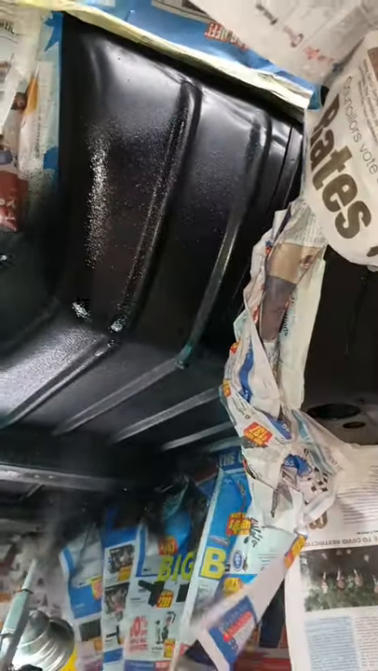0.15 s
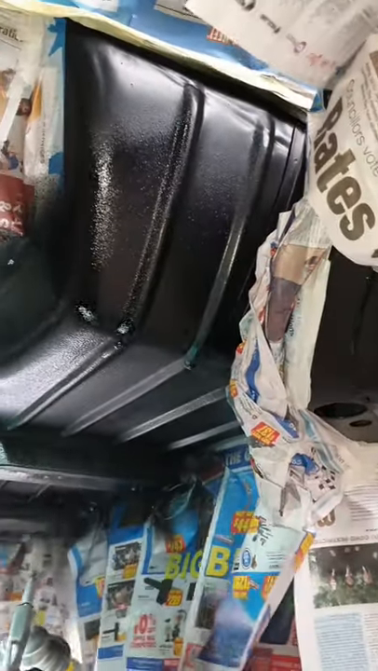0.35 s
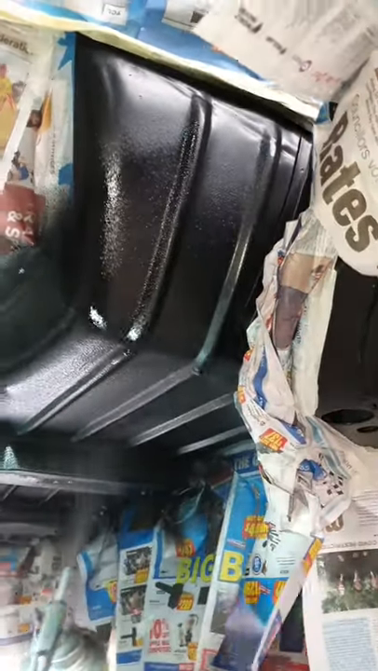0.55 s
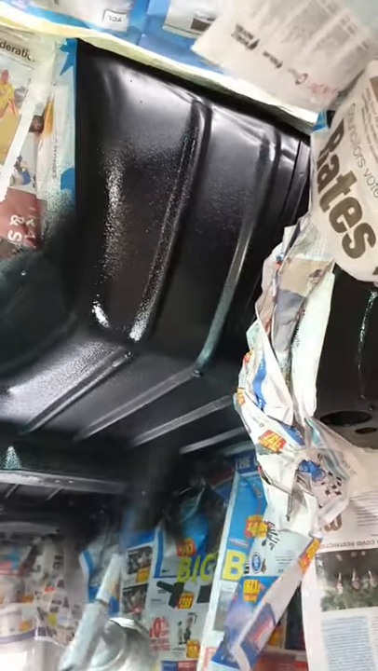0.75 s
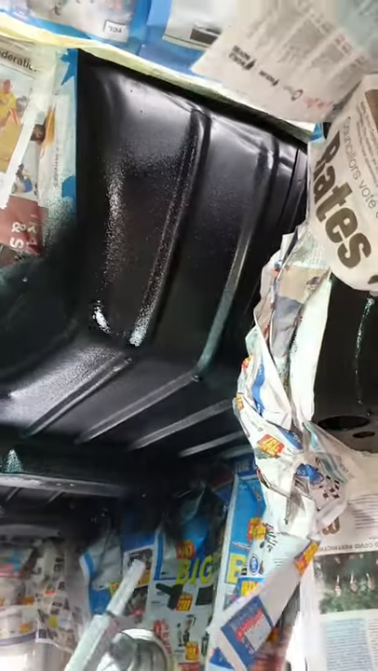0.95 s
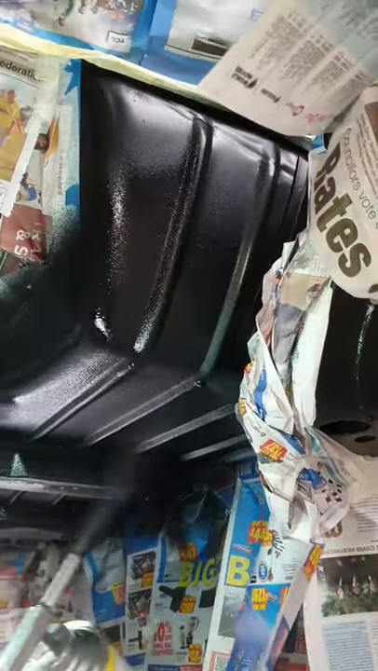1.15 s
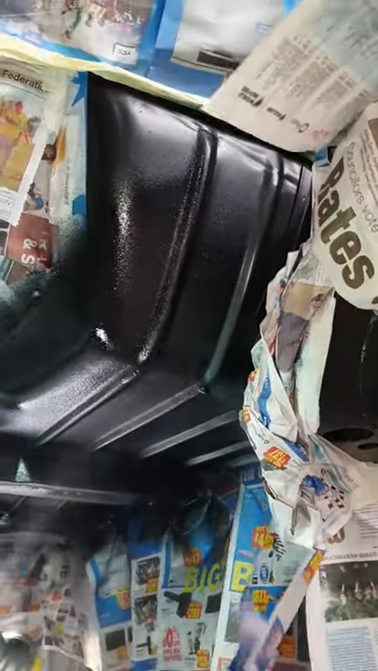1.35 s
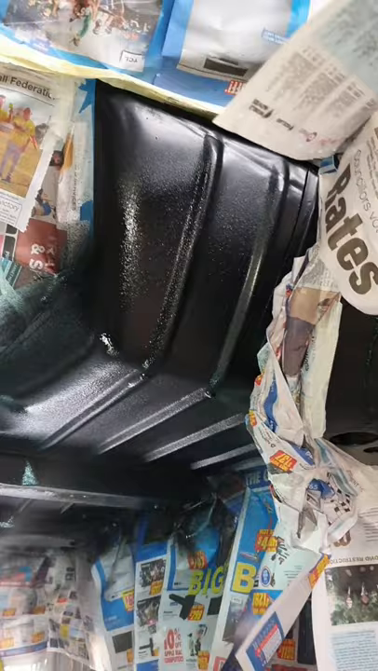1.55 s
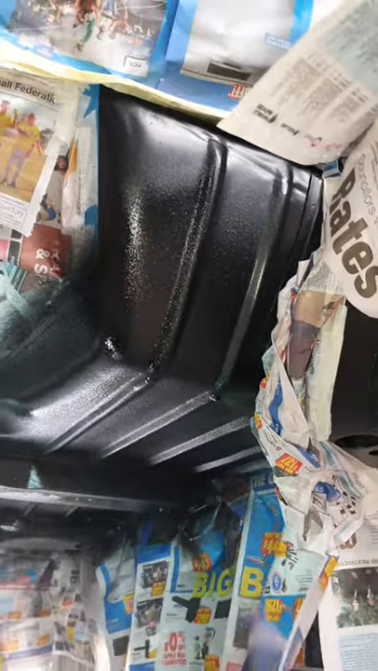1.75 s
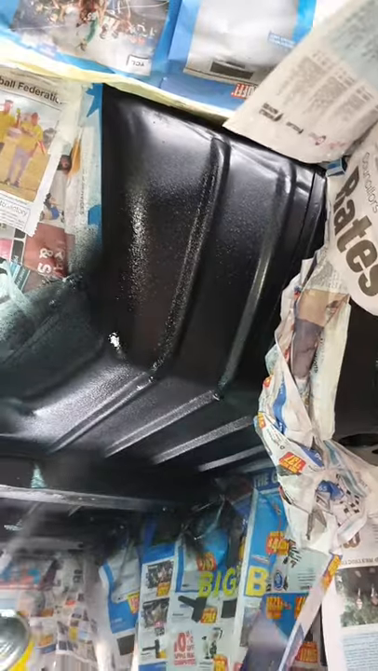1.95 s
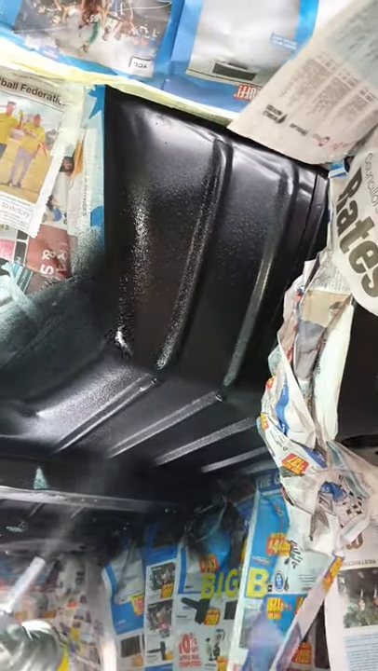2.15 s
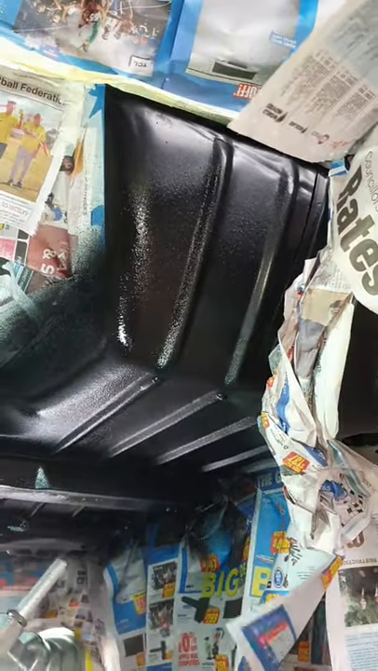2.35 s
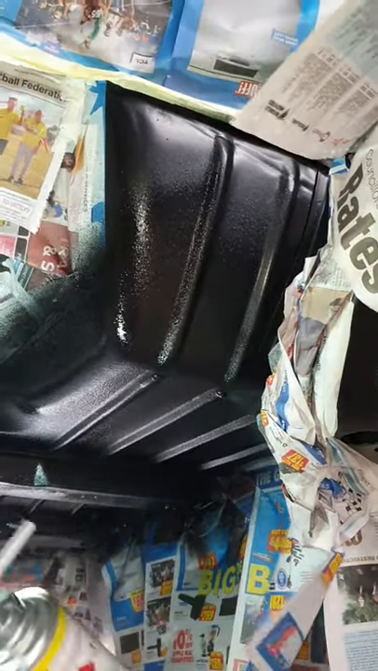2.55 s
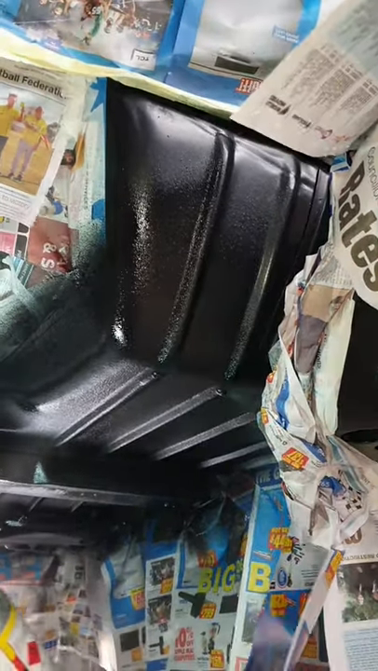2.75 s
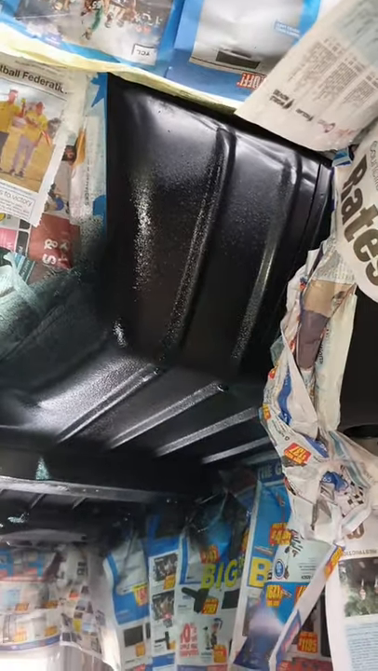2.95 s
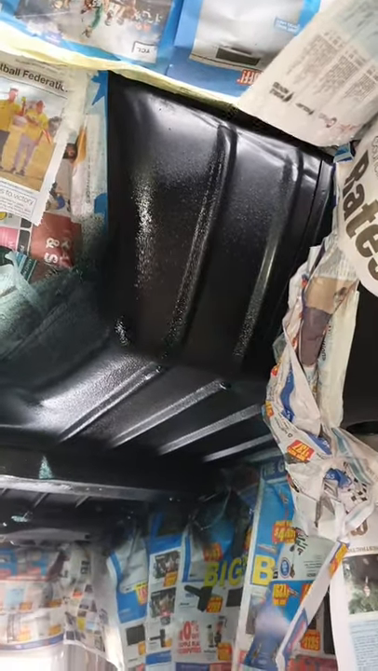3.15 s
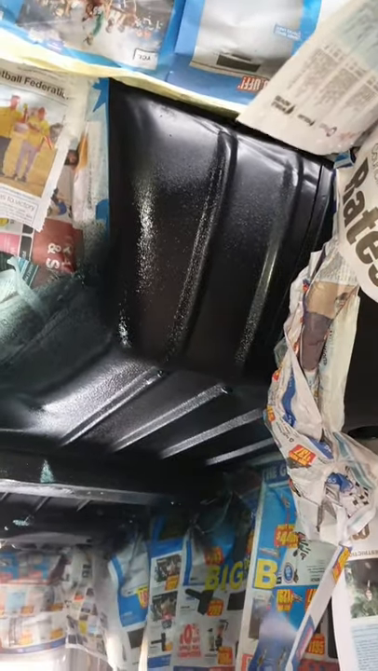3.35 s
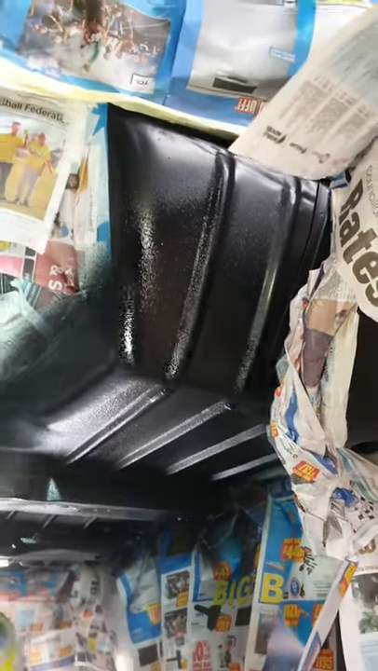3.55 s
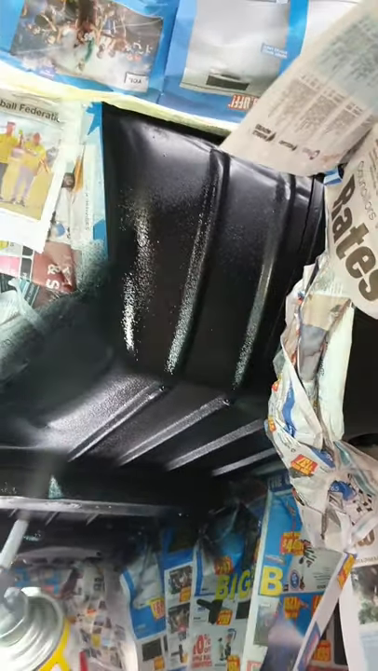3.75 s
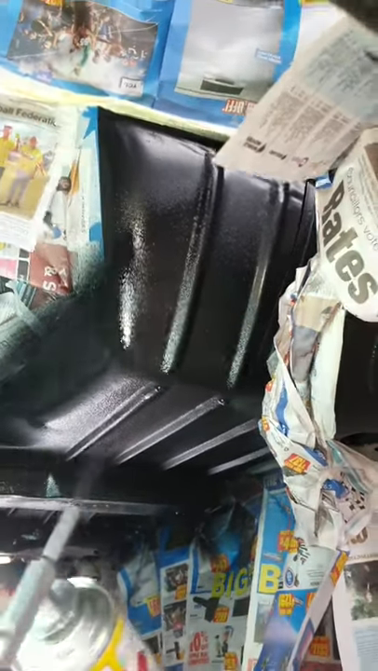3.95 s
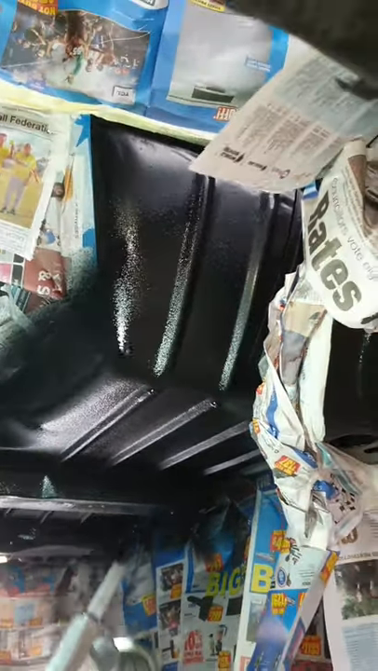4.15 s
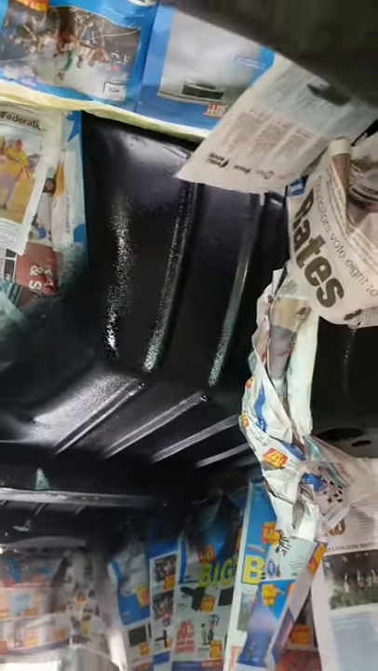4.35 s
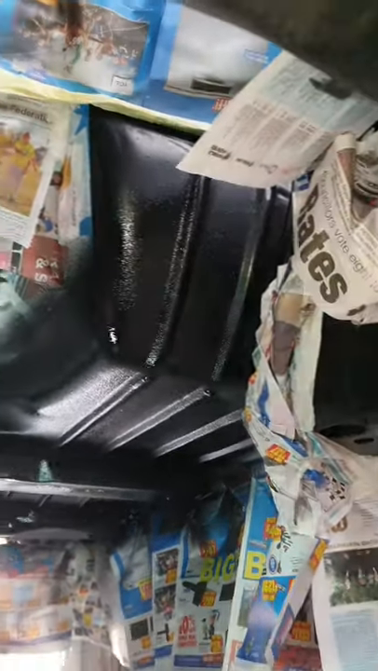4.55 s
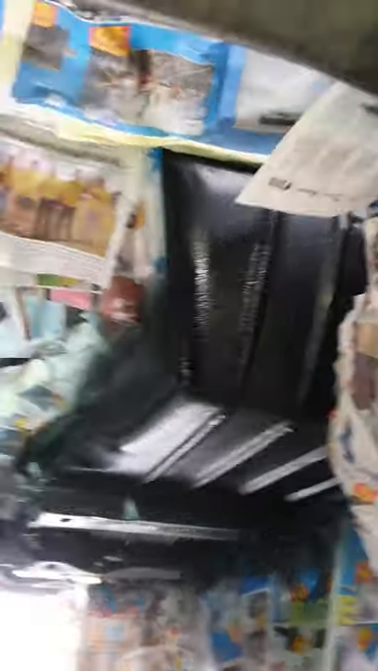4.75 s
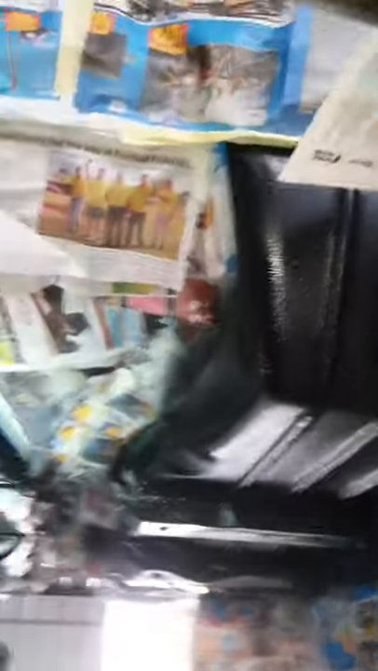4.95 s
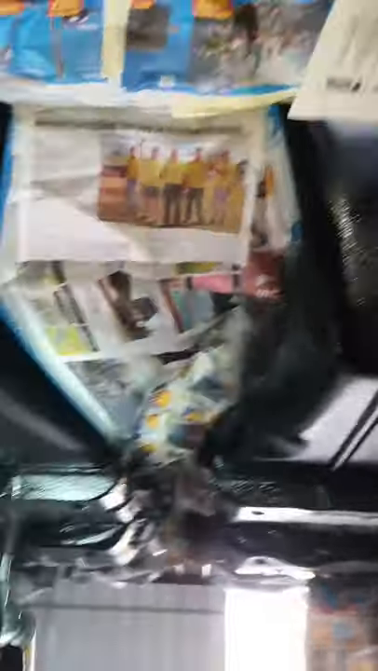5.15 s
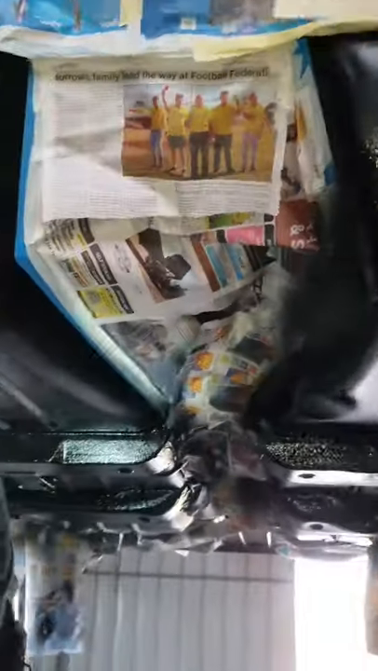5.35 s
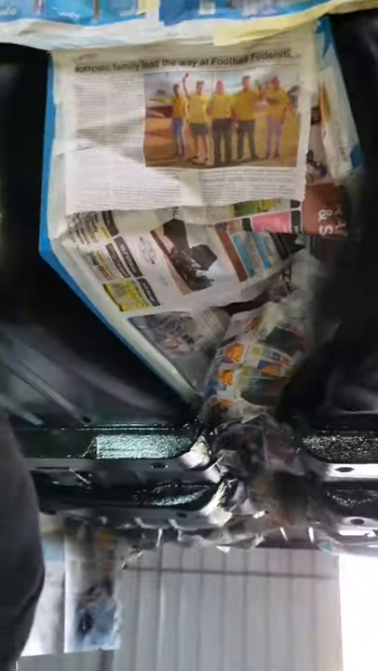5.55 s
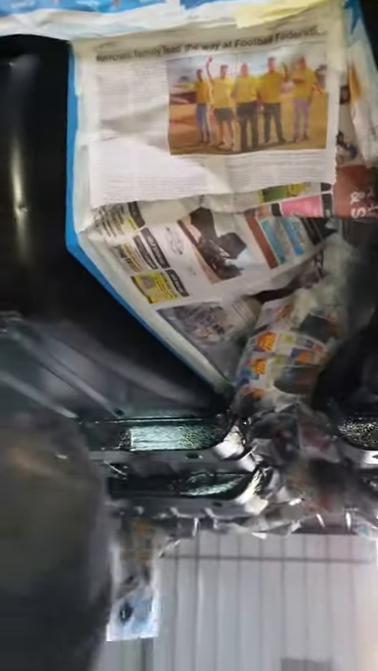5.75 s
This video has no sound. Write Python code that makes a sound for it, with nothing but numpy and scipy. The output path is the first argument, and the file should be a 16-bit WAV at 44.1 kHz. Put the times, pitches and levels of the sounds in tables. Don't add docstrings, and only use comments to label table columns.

```python
import sys
import numpy as np
from scipy import signal
from scipy.fft import rfft, irfft, next_fast_len
from scipy.io import wavfile
from scipy.ndimage import map_coordinates

SR = 44100
rng = np.random.default_rng(int(sys.argv[2]) if len(sys.argv) > 2 else 0)


def how_loud(loudness_db):
    steps = np.asarray(loudness_db, float) / 20
    return 10 ** steps


def unload_audio(sound):
    columns = np.transpose(np.atleast_2d(sound))
    steps = np.round(np.clip(columns, -1, 1) * 32767)
    wavfile.write(sys.argv[1], SR, steps.astype(np.int16))


N = 255339

# opens in seconds, shuts in seconds, opening time in seconds,
# shutting time in seconds.
TRIGGER_PULLS = [
    (-.1, .185, .004, .008),
    (.360, .790, .006, .008),
    (1.069, 1.497, .006, .009),
    (1.704, 2.225, .003, .008),
    (2.524, 2.985, .007, .010),
    (3.254, 3.895, .003, .008),
    (4.888, 5.505, .007, .014),
]
# time in seconds, treble level in dB, middle minus treble in dB,
# left minus right in dB.
JET_PULLS = [
    [(0.0, -23, -2.5, 1), (0.17, -24.5, -0.5, 1.5)],
    [(0.39, -26, 2, 1), (0.456, -25, -1, 3.5), (0.718, -22.5, -3.5, 3.0), (0.762, -24, -0.5, 3.0),
     (0.78, -24, -1, 4)],
    [(1.1, -22.5, -3, 1), (1.122, -23.5, -2, 2), (1.394, -25.5, 0, 2.0), (1.426, -24, -3, 3.5),
     (1.49, -24, -1, 2.0)],
    [(1.73, -25.5, -0.5, 1.5), (1.906, -23, -1.5, 2), (2.088, -23, -1, 4), (2.22, -24.5, -1.5, 3.0)],
    [(2.555, -24, 0, 2), (2.701, -23, -4, 1.5), (2.799, -24.5, -1.5, 2.5), (2.975, -25, -1.5, 3)],
    [(3.28, -27, 1, 0.5), (3.32, -23.5, -1, 1.5), (3.412, -22.5, -2, 2.5), (3.885, -23, -2.5, 4)],
    [(4.92, -28, -0.5, 2.0), (5.056, -24, -2, 2), (5.152, -22, -0.5, 0.5), (5.22, -24.5, 0.5, 3.5),
     (5.284, -22, -1.5, 2), (5.316, -25.5, 1.5, 3.5), (5.41, -25.5, 0, 4.5), (5.49, -26.5, 1.5, 5.5)],
]
# frequency in Hz, level in dB per Hz.
LEFT_PORT = [(900, -13.5), (1500, -12), (2100, -7), (3000, -2.5), (4500, -2.3), (5500, -1.6), (6300, 2.2),
             (7050, 1.2), (7500, -6.5), (8500, -2.5), (10000, -4), (12000, -4), (14000, -2), (15600, 1.5)]
# frequency in Hz, level in dB per Hz.
RIGHT_PORT = [(900, -15), (1500, -14.5), (2100, -8.5), (2700, -18.5), (3700, -12), (4750, -6), (5800, -19),
              (6800, -21), (7900, -15.5), (9000, -6.5), (10500, -9.5), (12200, -2.1), (14000, -11.5),
              (15600, -13.7)]
# delay in seconds, sway in seconds as the hand moves, level in dB.
PANEL_ECHOES = [(.0007, .00012, -9.5), (.0016, .0002, -8.5), (.0029, .0003, -7.5), (.0047, .0004, -9.5),
                (.0075, .0004, -11.5)]
# frequency in Hz, time under the car in seconds,
# time in the garage in seconds.
DECAY_TIMES = [(700, .25, .9), (2000, .25, .85), (5000, .22, .7), (9000, .2, .55), (15000, .18, .45)]
# multiple of the turning rate, left level in dB rms, right level in dB rms.
COMPRESSOR_TONES = [(3, -69, -74), (4, -51, -49.5), (5, -47.5, -47.5), (6, -55.5, -56.5), (7, -78, -73),
                    (8, -70, -65), (9, -54, -53.0), (10, -52.0, -50.5), (11, -61, -63), (12, -57, -57.0),
                    (13, -48.0, -49.0), (14, -40, -40.5), (15, -61, -75), (16, -65, -66),
                    (17, -43.5, -55.5), (18, -47.5, -51.5), (19, -56, -57.5), (20, -59, -74),
                    (21, -64, -62), (22, -59.5, -60), (23, -57.5, -64), (24, -53.0, -51.5),
                    (25, -48.0, -54.5), (26, -66, -66), (27, -57, -64), (28, -64, -66), (29, -54.5, -58),
                    (30, -52, -47.5), (31, -55, -65), (32, -60, -69), (33, -65, -73), (34, -63, -64),
                    (35, -64, -63.5), (36, -62, -74), (37, -63, -73), (38, -69, -66), (39, -68, -72),
                    (40, -63, -76), (41, -67, -60), (42, -66, -67), (43, -49.5, -56.5), (44, -56.0, -69),
                    (45, -65, -67)]
# frequency in Hz, share of a turn.
SWELL_POINTS = [(85, .46), (180, .7), (255, 1.07), (330, 1.3), (460, 1.62), (560, 1.55), (800, 1.5)]
# frequency in Hz, level in dB per Hz.
AIR_COLOUR = [(25, -18), (47, -5.5), (70, -2.5), (100, 1.5), (140, -5), (200, 0), (500, 2), (850, -3),
              (1050, -7), (1500, -9), (2100, -17), (3000, -22), (6300, -30), (15000, -40)]
# frequency in Hz, likeness from -1 to 1.
AIR_LIKENESS = [(60, 0.99), (180, 0.93), (550, 0.51), (1650, 0.07), (4970, 0.02), (15000, -0.01)]
# time in seconds, drone tones in dB, air noise in dB,
# nearby rustle in dB.
LISTENER_SHIFT = [(0, -0.5, 2, -58), (1, 0.5, 1, -53), (2, -0.5, 0, -49), (3, -0.5, 0, -58), (4, 1, 0, -73),
                  (4.8, 0, 0.5, -69), (5.1, -0.5, 4.5, -60), (5.5, -0.5, 4.5, -55), (5.6, 2, 5.5, -38),
                  (5.7, 1.5, 7, -36), (5.75, 3, 8, -30.5), (5.79, -2, 9, -32)]

TURN_HZ = 18.718
UNDER_CAR_DB, GARAGE_DB = -9.5, -7.5
SPECTRUM_SIZE = next_fast_len(N + SR)
T = np.arange(N) / SR
HZ = np.maximum(np.fft.rfftfreq(SPECTRUM_SIZE, 1 / SR), 1)


def in_time(rows):
    seconds, *columns = np.transpose(rows)
    return [np.interp(T, seconds, column) for column in columns]


def at_hz(points, hz, column=1):
    table = np.array(points)
    return np.interp(np.log(hz), np.log(table[:, 0]), table[:, column])


def filtered(x, gain):
    return irfft(rfft(x, SPECTRUM_SIZE) * gain, SPECTRUM_SIZE)[..., :N]


def drift(rate_hz, count):
    r = np.exp(-200 * np.pi * rate_hz / SR)
    chance = rng.standard_normal((count, N // 100 + 1002))
    slow = signal.lfilter([1], [1, -2 * r, r * r], chance)[:, 1000:]
    slow = slow / slow.std(axis=1, keepdims=True)
    return np.array([np.interp(np.arange(N) / 100, np.arange(len(row)), row) for row in slow])


def compressor(tones_db):
    multiple, left_db, right_db = np.transpose(COMPRESSOR_TONES)
    hz = multiple * TURN_HZ
    start = -2 * np.pi * np.cumsum(at_hz(SWELL_POINTS, hz - TURN_HZ / 2))
    waver = drift(1.5, count=12)
    right_delay_s = .00018
    out = np.zeros((2, N))
    for i in range(len(multiple)):
        phase = 2 * np.pi * hz[i] * T + start[i] + .012 * multiple[i] * waver[i % 12]
        gain = np.sqrt(2) * how_loud(1.2 * waver[(i + 5) % 12] - 1)
        out[0] += gain * how_loud(left_db[i]) * np.cos(phase)
        out[1] += gain * how_loud(right_db[i]) * np.cos(phase - 2 * np.pi * hz[i] * right_delay_s)
    return out * how_loud(tones_db)


def air(noise_db):
    mid, side = rng.standard_normal((2, N))
    alike = np.clip(at_hz(AIR_LIKENESS, HZ), 0, 1)
    colour = how_loud(at_hz(AIR_COLOUR, HZ) - 3.5)
    same = filtered(mid, colour * np.sqrt(1 + alike))
    opposite = filtered(side, colour * np.sqrt(1 - alike)) * [[1], [-1]]
    noise = same + opposite
    low = filtered(noise, 1 / (1 + (HZ / 900) ** 4))
    stroke_db = 1.0 * np.cos(2 * np.pi * (TURN_HZ * T - .55))
    return noise - low + low * how_loud(noise_db + stroke_db + 1.5 * drift(4, count=1))


def rustle(level_db):
    colour = how_loud(at_hz([(400, 5), (1000, 25), (2000, 25), (4000, 13.5), (15000, -1)], HZ))
    lumps_db = 2.5 * drift(30, count=1)
    return filtered(rng.standard_normal((2, N)), colour) * how_loud(level_db + lumps_db)


def reverb(x):
    t = np.arange(SR) / SR
    tail = 0
    edges_hz = 500 * 2 ** np.arange(0, 5.3, .5)
    for low, high in zip(edges_hz, edges_hz[1:]):
        half_octave = signal.butter(2, [low, high], "band", fs=SR, output="sos")
        band = signal.sosfilt(half_octave, rng.standard_normal((2, SR)))
        for noise, column, level_db in ((band[0], 1, UNDER_CAR_DB), (band[1], 2, GARAGE_DB)):
            t60 = at_hz(DECAY_TIMES, np.sqrt(low * high), column)
            even_energy = np.sqrt(6 * np.log(10) / (t60 * SR))
            tail = tail + noise * how_loud(level_db - 60 * t / t60) * even_energy
    return filtered(x, rfft(tail, SPECTRUM_SIZE))


def panel_echoes(x, sway_hz):
    out = x.copy()
    sways = drift(sway_hz, count=len(PANEL_ECHOES))
    for (delay, sway, level_db), move in zip(PANEL_ECHOES, sways):
        heard_at = np.arange(N) - SR * (delay + sway * move)
        out += how_loud(level_db) * map_coordinates(x, [heard_at], order=3)
    return out


def valve():
    flow = np.zeros(N)
    for opens, shuts, rise, fall in TRIGGER_PULLS:
        up = np.clip((T - opens) / (2 * rise), 0, 1)
        flow += np.sin(np.pi / 2 * up) ** 2 * np.exp(-np.maximum(T - shuts, 0) / fall)
    return flow


def spray():
    treble_db, middle_db, pan_db = in_time(sum(JET_PULLS, []))
    shared, left, right = rng.standard_normal((3, N))
    alike = np.clip(at_hz([(700, .5), (1500, .25), (3000, .05)], HZ), 0, 1)
    middle = 1 / (1 + (HZ / 7400) ** 12)
    low_cut = 1 / np.sqrt(1 + (600 / HZ) ** 4)
    out = []
    for own, side in ((left, .5), (right, -.5)):
        jet = filtered(shared, np.sqrt(alike) * low_cut) + filtered(own, np.sqrt(1 - alike) * low_cut)
        low = filtered(jet, middle)
        jet = jet - low + low * how_loud(middle_db + 0.96)
        sputter_db = .7 * drift(25, count=1)[0]
        jet = jet * valve() * how_loud(treble_db + 21.5 + side * (pan_db - 3.0) + sputter_db)
        near = panel_echoes(jet, sway_hz=1.5)
        out.append(near + reverb(near))
    return np.array(out)


def scene():
    tones_db, noise_db, rustle_db = in_time(LISTENER_SHIFT)
    ports = how_loud([at_hz(LEFT_PORT, HZ) - 11.6, at_hz(RIGHT_PORT, HZ) - 11.6])
    noises = spray() + air(noise_db) + rustle(rustle_db)
    return filtered(noises, ports) + compressor(tones_db)


def band_limit(x):
    return signal.sosfilt(signal.butter(12, 17080, fs=SR, output="sos"), x)


def record(dry):
    top_cut = signal.cheby2(16, 60, 16050, fs=SR, output="sos")
    mix = signal.sosfilt(top_cut, dry)
    return band_limit(mix)


dry = scene()
out = record(dry)
unload_audio(out)
```